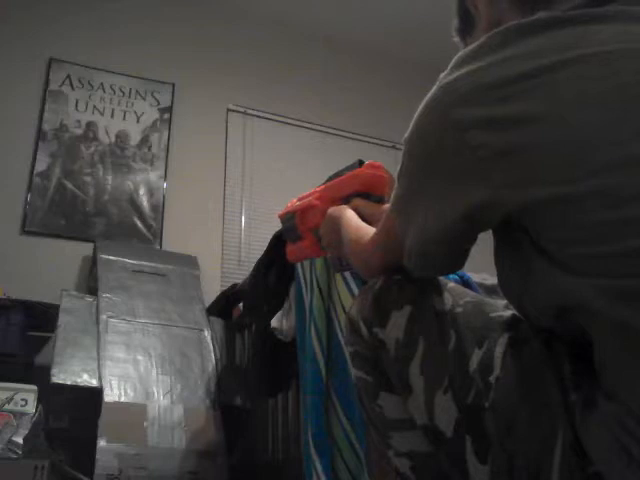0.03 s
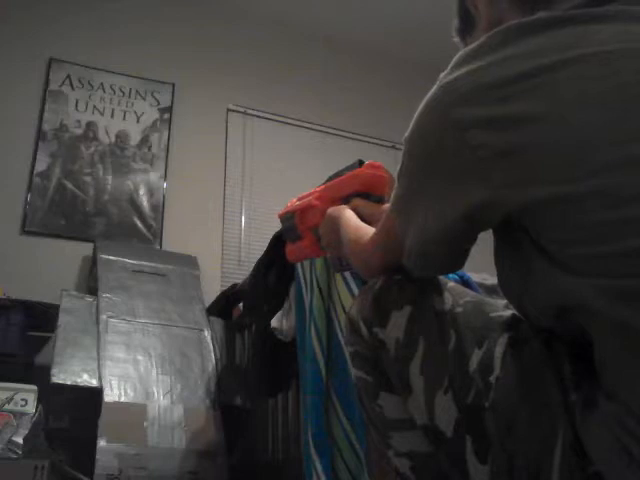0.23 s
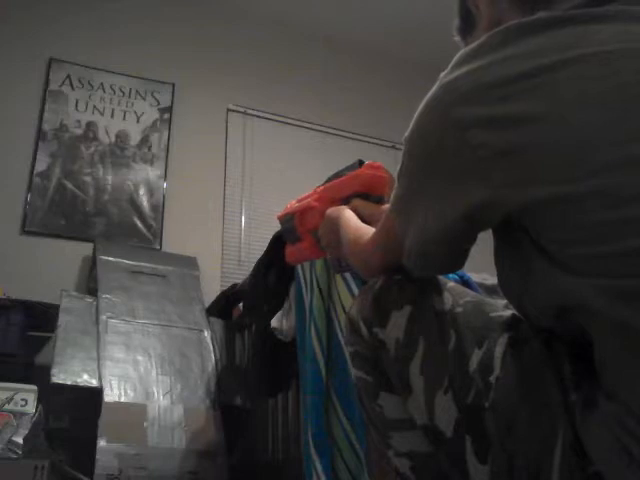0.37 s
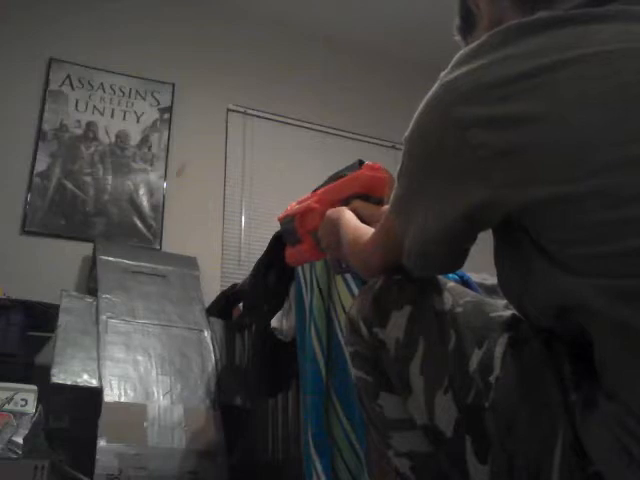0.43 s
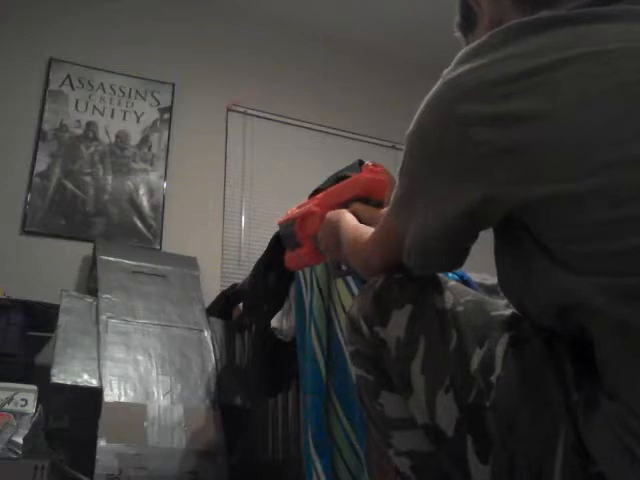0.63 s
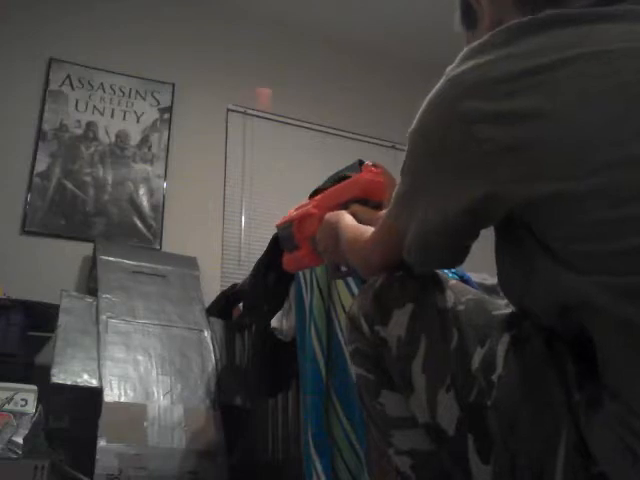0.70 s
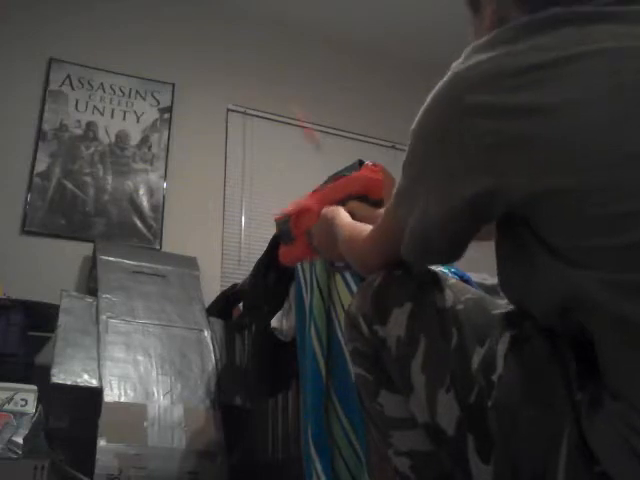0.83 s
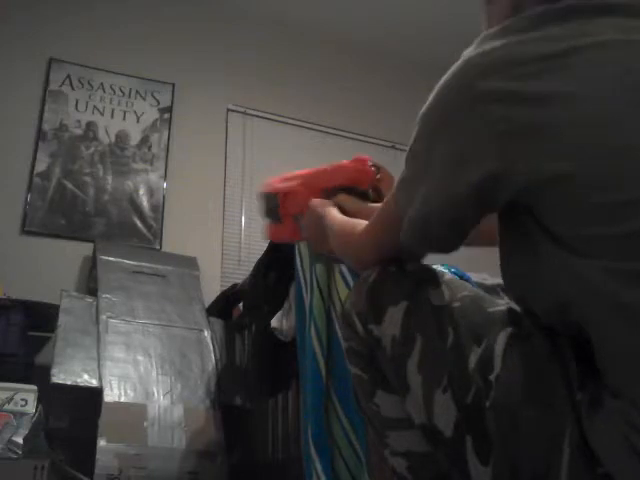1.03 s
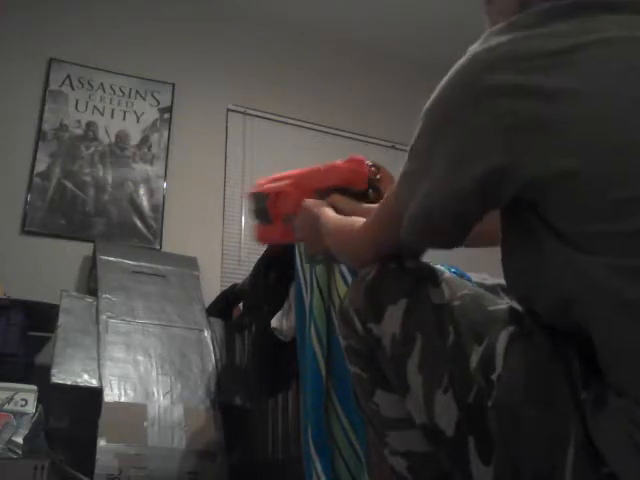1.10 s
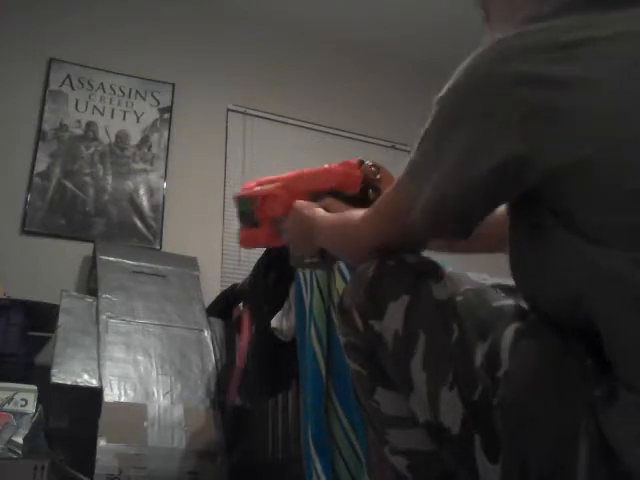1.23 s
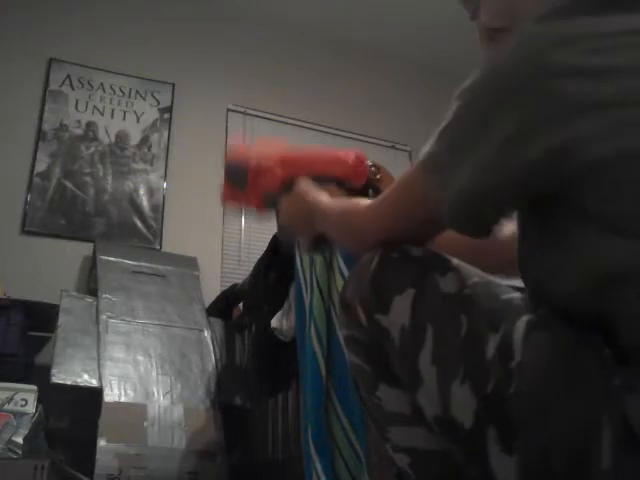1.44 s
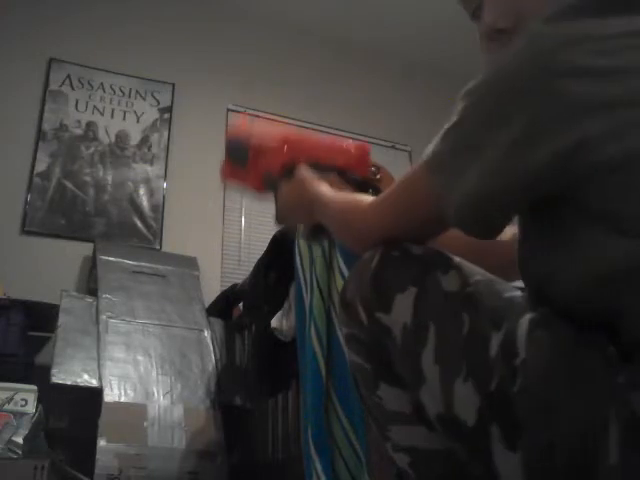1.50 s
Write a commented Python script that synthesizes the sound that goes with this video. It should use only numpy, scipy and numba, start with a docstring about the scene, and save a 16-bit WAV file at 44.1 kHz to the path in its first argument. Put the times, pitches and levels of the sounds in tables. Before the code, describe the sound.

A toy dart blaster fires one sharp pop that overloads the microphone, its spring buzzing and ringing. The foam dart thuds against a wall in a small bedroom, then light plastic clicks, faint rustling and a dull bump follow.

```python
"""Toy dart blaster in a small bedroom

The trigger creaks, the spring drives the plunger home with a pop, and spring and barrel buzz and ring.
The foam dart thuds against the far wall, which booms with the room. Then the plastic shell clicks,
rubs against hand and sleeve and takes a dull bump. The pop overloads the microphone, whose gain
control ducks and recovers under the ringing of the room."""
import sys
import numpy as np
from scipy import signal
from scipy.fft import rfft, irfft
from scipy.io import wavfile
from scipy.ndimage import uniform_filter1d, minimum_filter1d
from numba import njit

SR = 44100
rng = np.random.default_rng(int(sys.argv[2]) if len(sys.argv) > 2 else 0)


def file_out(sig):
    """Save sig as 16-bit WAV at sys.argv[1]."""
    # one column per channel
    cols = np.atleast_2d(sig).T
    # limit, then scale
    lim = np.clip(cols, -1, 1)
    pcm = np.round(lim * 32767).astype(np.int16)
    wavfile.write(sys.argv[1], SR, pcm)


N = 68355

# room tone with microphone hiss: f/Hz, level/dB
ROOM_TONE_COLOUR = [(30, -4.5), (150, -12), (210, 3), (330, -3.5), (500, -9.5), (900, -17), (2000, -22),
                    (4500, -23.5), (14500, -21.5)]
# decay of the bedroom: f/Hz, t60/s
ROOM_DECAY = [(100, 0.43), (300, 0.24), (600, .34), (1500, 0.27), (4000, 0.24), (8000, 0.32), (14000, 0.1)]

# tone of the plastic shell: f/Hz, level/dB
SHELL_COLOUR = [(40, -28.5), (150, -8), (300, -2), (550, -4), (750, -0.5), (1000, 0.5), (1350, 3),
                (2500, -2), (3600, -0.5), (4400, 1), (5500, -10.5), (7500, -17), (10000, -34),
                (15000, -43.5)]
# sleeve and hand brush the shell: t/s, level/dB, half-length/s
SHELL_RUBS = [(0.098, -45.5, 0.046), (0.906, -45.5, 0.039), (1.291, -65, 0.022), (1.386, -53, 0.039)]
# trigger and shell clicks: t/s, level/dB, t60/s, tilt/(dB per octave), reverb send/dB
SHELL_CLICKS = [(0.049, -41, 0.1, 1.5, -4.5), (0.069, -47.5, 0.077, -1, 7), (0.0892, -32.5, 0.047, 1, -4.5),
                (0.531, -21, 0.058, 6.5, -7.5), (0.544, -26.5, 0.1, 2.5, -9),
                (0.557, -29.5, 0.064, 2.5, -9), (0.6157, -34, 0.041, 3.5, -4.5),
                (0.768, -46.5, 0.1, 2, -8.5), (.861, -42.5, 0.047, 3.5, -4.5), (0.8683, -33, 0.06, 1, -8),
                (0.883, -40.5, .07, -2, -19), (0.895, -41.5, 0.06, -0.5, -14),
                (0.907, -43.5, 0.056, -6, -21), (1.48, -56, 0.12, -1, -5.5)]
# short pings of the shell and the barrel's note after the pop: t/s, f/Hz, level/dB, t60/s
SHORT_PINGS = [(0.089, 4290, -32.5, 0.031), (.090, 765, -37, 0.12), (.202, 4260, -3, 0.062),
               (.234, 962, -9.5, 0.084), (0.534, 4011, -33.5, 0.11), (0.8709, 4353, -27, 0.028),
               (0.869, 1267, -38, 0.081), (.896, 1874, -34, 0.067), (1.396, 4330, -41.5, 0.023)]

# a hand bumps the blaster: t/s, level/dB, f/Hz, t60/s, slap/dB
BUMP_KNOCK = (1.3605, -12, 319.5, 0.0453, -16)
# tone of the bump's slap: f/Hz, level/dB
BUMP_SLAP_COLOUR = [(60, -44.5), (210, 3.5), (480, 2.5), (900, -11), (1600, -23.5), (4300, -30.5),
                    (8000, -48.5)]
# the bump off the nearest walls: delay/s, level/dB
BUMP_REFLECTIONS = [(0.0095, -2.5), (0.0212, -7.5), (0.03, -7), (.0445, -8), (.061, -12.5)]
# low ring of the room after the bump: f/Hz, level/dB, t60/s
BUMP_ROOM_MODES = [(218, -24, 0.198), (336.4, -30.5, 0.12), (416, -36, 0.15), (587, -40, 0.306),
                   (891, -47.5, 0.33)]

# the dart hits the far wall: t/s, level/dB, f/Hz, t60/s, slap/dB
DART_KNOCK = (.2872, 6, 385, 0.011, -10)
# the higher, slappier knock that the room returns: level/dB, f/Hz, t60/s, slap/dB
RETURN_KNOCK = (-2.5, 511.5, 0.0533, -2.5)
# tone of the dart's slap: f/Hz, level/dB
DART_SLAP_COLOUR = [(30, -7), (220, -5), (450, 3), (750, 3), (1050, -2), (1700, -11), (2500, -14.5),
                    (4300, -7), (6000, -27), (12000, -75.5)]
# the returned knock off the nearest walls: delay/s, level/dB
DART_REFLECTIONS = [(.0095, 0.5), (.024, -14.5), (.033, -4.5), (.0415, -3), (.0565, -3.5), (0.075, -8)]
# boom of the struck wall and the room: f/Hz, level/dB, t60/s
WALL_MODES = [(209, -20.5, 0.35), (410.2, -15.5, .37), (458.4, -17, 0.5), (544, -17.5, 0.37),
              (582, -15.5, 0.36), (848, -24, 0.16)]
# late arrival of the dart's reverb and boom: delay/s, level/dB
WASH_ARRIVAL = [(.017, -0.5)]

# catch lets go, plunger rushes, slams, bounces, spring rebounds: t/s, level/dB, attack/s, t60/s
SHOT_STROKES = [(0.193, -34, 0.00073, 0.15), (0.198, -6.5, 0.007, .05), (0.2111, 11, 0.00053, 0.04),
                (.2165, 4.5, 0.00079, 0.028), (0.256, -8, .002, 0.069)]
# tone of the shot through the barrel: f/Hz, level/dB
BARREL_COLOUR = [(30, -29), (130, -16.5), (300, -6.5), (600, -10), (950, -1), (1300, -7.5), (2000, -7.5),
                 (3300, -2.5), (4300, 3), (5000, -6), (5900, -18), (7500, -22.5), (10000, -61.5)]
# ring of spring and barrel: f/Hz, level/dB, t60/s
SPRING_MODES = [(934, 1, 0.11), (997, -5, .5), (1245, -19, 1.0), (3330, 1, 0.45), (3533, -7.5, .55),
                (3771, -9, 0.32), (4115, -4.5, .45), (4254, -8.5, 0.28), (4332, 2.5, 0.37),
                (4760, -9.5, 0.51)]


def undb(db):
    """Decibels to gain."""
    return 10 ** (np.asarray(db) / 20)


def since(start):
    """Seconds since a moment."""
    return np.arange(N) / SR - start


def fade(t, t60):
    """Exponential decay from time zero, silent before it."""
    return (t >= 0) * np.exp(-np.log(1000) * np.maximum(t, 0) / max(t60, 1e-3))


def on_log_axis(hz, points):
    """Read a curve of (f/Hz, value) points along a log frequency axis."""
    freqs, values = np.array(points, float).T
    return np.interp(np.log(np.maximum(hz, 1)), np.log(freqs), values)


def colour(x, points, tilt_db=0):
    """Minimum-phase EQ with a tilt per octave through the mids; the energy stays the same."""
    hz = np.fft.rfftfreq(N, 1 / SR)
    db = on_log_axis(hz, points) + tilt_db * np.log2(np.clip(hz, 200, 5000) / 1000)
    cepstrum = irfft(np.log(undb(db)), N)
    response = np.exp(rfft(2 * cepstrum * (np.arange(N) < N // 2)))
    shaped = irfft(rfft(x) * response, N)
    return shaped * np.linalg.norm(x) / np.linalg.norm(shaped)


def noise(points, tilt_db=0):
    """Coloured noise of unit power."""
    return colour(rng.standard_normal(N), points, tilt_db)


def burst(start, attack, t60, points, tilt_db=0):
    """A hit rings many close, heavily damped modes about evenly."""
    t = since(start)
    rise = np.clip(t / max(attack, 1e-4), 0, 1)
    envelope = rise * fade(t - np.minimum(t, attack), t60)
    spectrum = rfft(rng.standard_normal(N) * envelope)
    flattened = irfft(spectrum / np.abs(spectrum), N)
    hit = flattened * rise * fade(t, 3 * t60)  # a loose gate trims the smear from flattening
    return colour(hit, points, tilt_db) * np.linalg.norm(envelope) / np.linalg.norm(hit)


def ring(start, modes, waver_share=.006):
    """Struck modes swell over two cycles and die away, wavering slightly in pitch."""
    t, out = since(start), 0
    for hz, db, t60 in modes:
        waver = uniform_filter1d(rng.standard_normal(N), size=600)
        drift = waver_share * np.cumsum(waver / waver.std()) / SR
        turns = hz * (t + drift) + rng.random()
        envelope = np.clip(t * hz / 2, 0, 1) * fade(t, t60)
        out = out + undb(db) * np.sin(2 * np.pi * turns) * envelope
    return out


def knock(start, db, hz, t60, slap_db, slap_colour):
    """A soft blow swings a panel for a few cycles, with a slap on top."""
    t = since(start)
    contact = np.sin(np.pi / 2 * np.clip(t * hz, 0, 1)) ** 2
    swing = np.sin(2 * np.pi * hz * t) * fade(t, t60) * contact
    slap = undb(slap_db) * burst(start, 1 / hz, t60, slap_colour)
    return undb(db) * (swing + slap)


def reflect(x, echoes):
    """Delayed copies off the walls, wet only."""
    t = since(0)
    return sum(undb(db) * np.interp(t - delay, t, x) for delay, db in echoes)


def reverb(x, predelay_s=0.013, build_s=0.0094):
    """The bedroom's diffuse tail, wet only; each octave dies at its own rate."""
    t, hz = since(0), np.fft.rfftfreq(N, 1 / SR)
    white, tail = rfft(rng.standard_normal(N)), 0
    centres = 62.5 * 2. ** np.arange(9)
    for centre, share in zip(centres, np.eye(len(centres))):
        octave = irfft(white * on_log_axis(hz, list(zip(centres, share))), N)
        tail = tail + octave * fade(t, on_log_axis(centre, ROOM_DECAY))
    tail = tail * np.clip((t - predelay_s) / build_s, 0, 1)
    return signal.fftconvolve(x, tail / np.linalg.norm(tail))[:N]


def room_tone(level_db=-63):
    """A faint, steady bed of room air and microphone hiss."""
    return undb(level_db) * noise(ROOM_TONE_COLOUR)


def rustle(send_db=-16):
    """Cloth and skin catch and slip on the shell in small grains."""
    swell = sum(undb(db) * np.exp(-(since(peak) / width) ** 2) for peak, db, width in SHELL_RUBS)
    grains = uniform_filter1d(rng.exponential(size=N) ** 4, size=90)
    texture = np.sqrt(np.abs(grains) / grains.mean())
    rub = swell * texture * noise(SHELL_COLOUR, tilt_db=-1)
    return rub + undb(send_db) * reverb(rub)


def pings():
    """Single modes ring briefly: pings of the shell and the barrel's note after the pop."""
    return sum(ring(start, [(hz, db, t60)]) for start, hz, db, t60 in SHORT_PINGS)


def clicks(attack_s=0.00087):
    """Plastic parts snap against each other and ring the shell."""
    direct, send = 0, 0
    for start, db, t60, tilt_db, send_db in SHELL_CLICKS:
        click = undb(db) * burst(start, attack_s, t60, SHELL_COLOUR, tilt_db)
        direct = direct + click
        send = send + undb(send_db) * click
    return direct + reverb(send)


def hand_bump(send_db=-13):
    """A dull knock judders between the walls and leaves a low ring in the room."""
    blow = knock(*BUMP_KNOCK, BUMP_SLAP_COLOUR)
    judder = reflect(blow, BUMP_REFLECTIONS)
    return blow + judder + undb(send_db) * reverb(blow) + ring(BUMP_KNOCK[0], BUMP_ROOM_MODES)


def dart_thud():
    """The dart lands with one firm, deep knock; brighter echoes and the boom of wall and room follow."""
    start = DART_KNOCK[0]
    returned = knock(start, *RETURN_KNOCK, DART_SLAP_COLOUR)
    thud = knock(*DART_KNOCK, DART_SLAP_COLOUR)
    wash = reverb(returned) + ring(start, WALL_MODES)
    return thud + reflect(returned, DART_REFLECTIONS) + reflect(wash, WASH_ARRIVAL)


def shot(send_db=-17, ring_db=-14, buzz_db=-8, buzz_rise_s=0.076, buzz_t60_s=0.6):
    """The plunger's strokes crack through the barrel; the slam leaves the spring buzzing and ringing."""
    pop = sum(undb(db) * burst(start, attack, t60, BARREL_COLOUR)
              for start, db, attack, t60 in SHOT_STROKES)
    slam = SHOT_STROKES[2][0]
    t = since(slam)
    buzz_envelope = np.clip(t / buzz_rise_s, 0, 1) * fade(t, buzz_t60_s)
    buzz = undb(buzz_db) * noise(BARREL_COLOUR) * buzz_envelope
    return pop + undb(send_db) * reverb(pop) + buzz + undb(ring_db) * ring(slam, SPRING_MODES)


def scene():
    """Mono mix of blaster, dart and handling over the room tone."""
    return (shot() + clicks() + pings() + dart_thud() + hand_bump() + rustle() + room_tone())[None]


@njit
def follow(x, attack, release):
    """Envelope follower with separate rise and fall rates per sample."""
    out, level = np.empty(len(x)), 0.
    for i in range(len(x)):
        level += (x[i] - level) * (attack if x[i] > level else release)
        out[i] = level
    return out


def gain_control(x, threshold_db=-13, slope=0.55, attack_s=0.022, release_s=0.031):
    """Ducks loud sound and recovers, too slowly to catch the front of the pop."""
    level = follow(np.abs(x), 1 / (attack_s * SR), 1 / (release_s * SR))
    return x * np.minimum(1, undb(threshold_db) / (level + 1e-9)) ** slope


def peak_limiter(x, ceiling=.95, deepest_db=-3, hold_s=.003):
    """Fast, shallow gain dips shave the peaks."""
    hold = int(hold_s * SR)
    dip = np.clip(ceiling / (np.abs(x) + 1e-9), undb(deepest_db), 1)
    return x * uniform_filter1d(minimum_filter1d(dip, hold), hold)


def record(dry):
    """Microphone chain: low cut, gain control, limiter, hard clipping on the pop, steep high cut."""
    low_cut = signal.butter(2, 199, "high", fs=SR, output="sos")
    high_cut = signal.ellip(12, .2, 95, 14700, fs=SR, output="sos")
    thinned = signal.sosfilt(low_cut, dry[0])
    clipped = np.clip(peak_limiter(gain_control(thinned)), -1, 1)
    return signal.sosfilt(high_cut, clipped)[None]


dry = scene()
out = record(dry)
file_out(out)
```